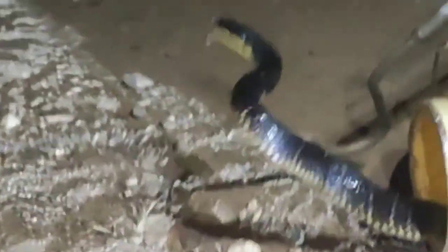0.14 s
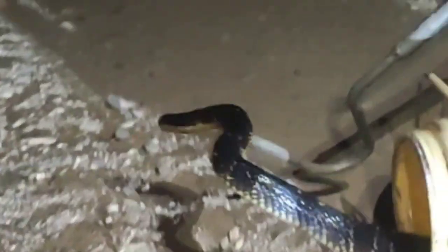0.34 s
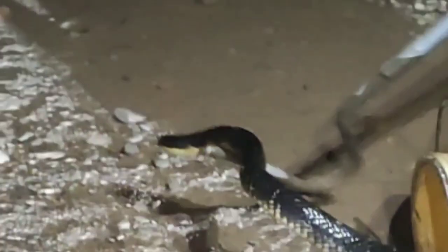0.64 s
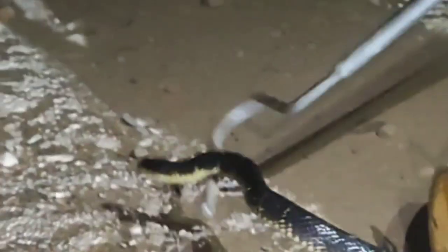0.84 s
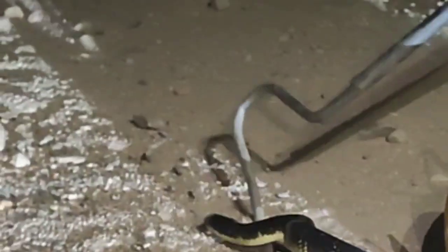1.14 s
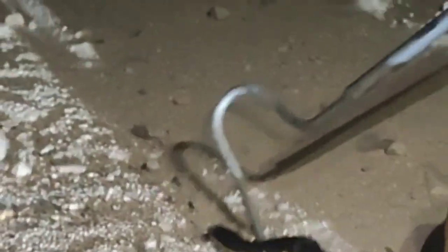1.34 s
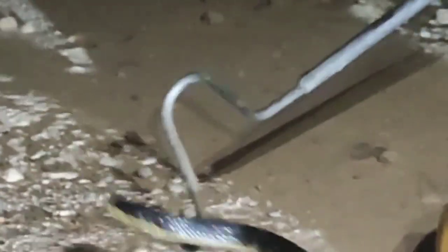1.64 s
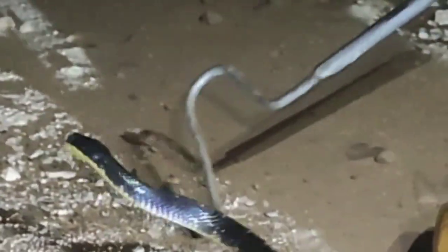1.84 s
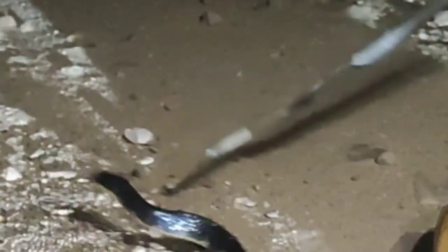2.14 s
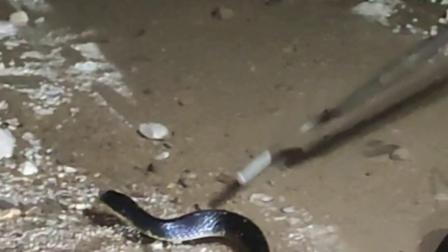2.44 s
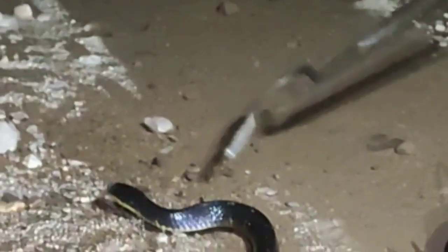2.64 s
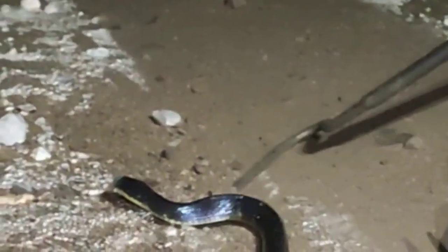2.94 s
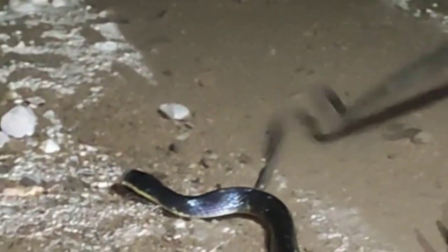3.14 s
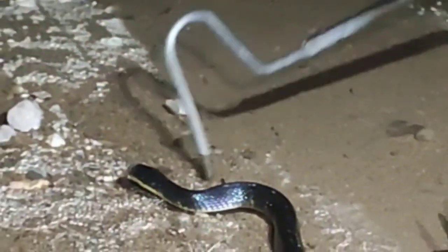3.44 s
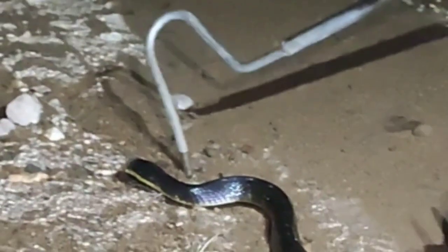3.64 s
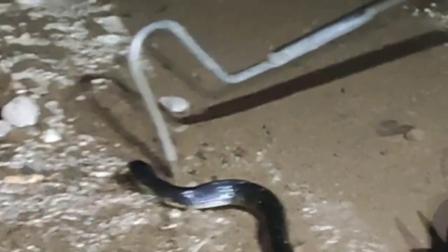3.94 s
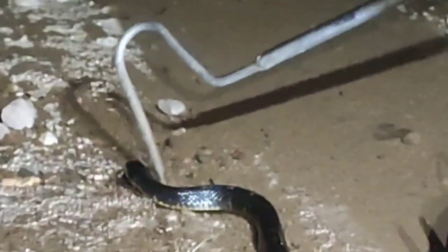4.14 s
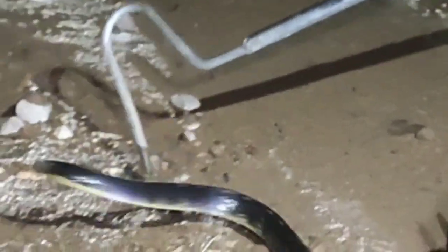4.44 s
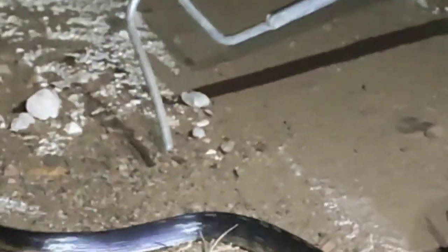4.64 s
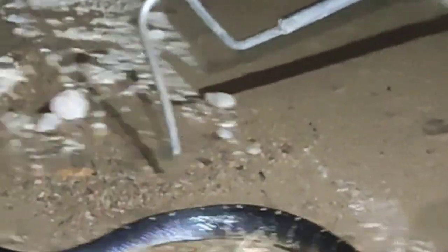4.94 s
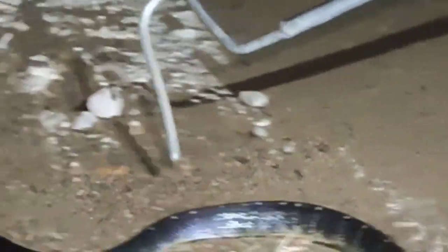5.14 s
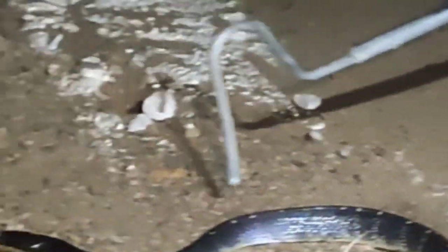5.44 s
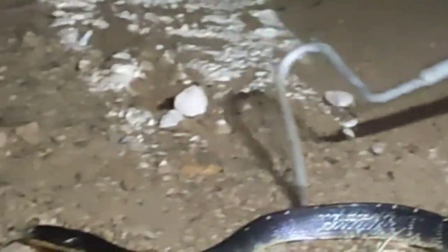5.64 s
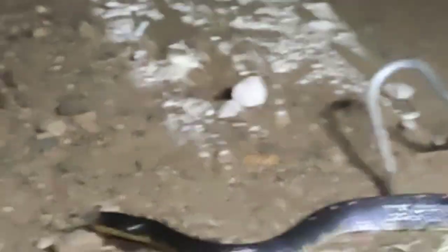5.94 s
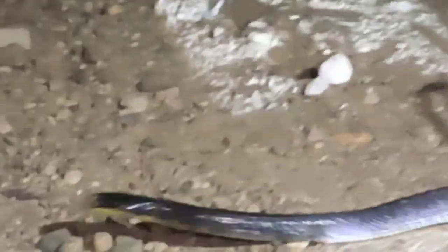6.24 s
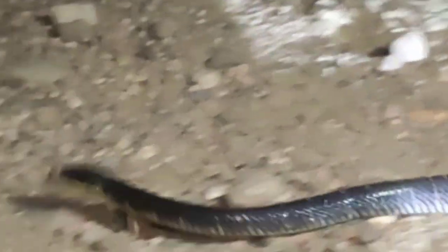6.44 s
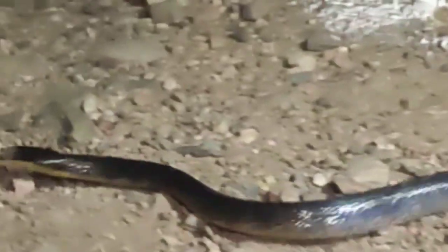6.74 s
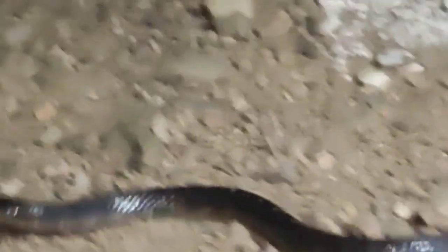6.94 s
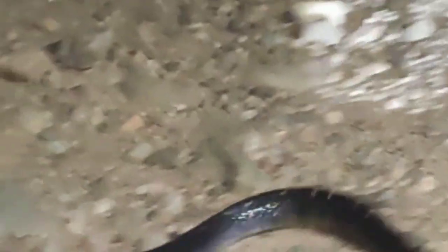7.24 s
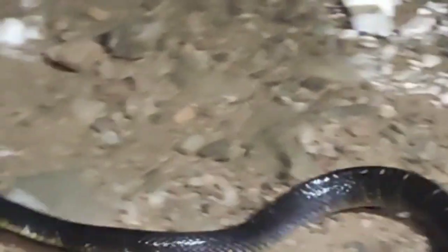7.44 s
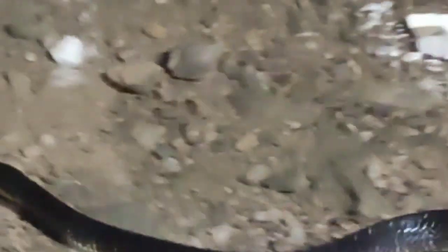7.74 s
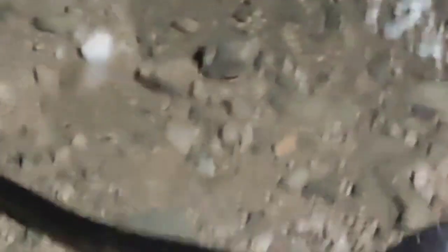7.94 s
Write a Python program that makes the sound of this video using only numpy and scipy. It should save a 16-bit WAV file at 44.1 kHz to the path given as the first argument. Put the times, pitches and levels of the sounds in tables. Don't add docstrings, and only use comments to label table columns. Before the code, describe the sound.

Night insects run throughout: wavering cricket trills around a low whistle pitch, a quick higher chirper, a thin airy rasp about three times a second, distant insect hiss and faint low rumble. Close by, from 0 to 0.3 s, gravel scuffs and a hollow pail knocks along in small jerks. Light metal touches and a pebble click come around 1.1 s. At 2.1-2.2 s a dull scuff and snap. At about 2.86 s the loudest event: a metal tube hits stone with a hard clack and bright inharmonic ring, rebounding and fading within about a third of a second. A pebble snaps at 3.3 s; faint stone groans follow to 4 s. Around 4.6-5 s stones shift, with grit and small metallic taps. At 6.2-6.4 s come gravel crunch and rapid clicks, a sharp snap at 6.7 s, a tiny metal tick at 7.3 s, then sliding and a final scuff near 8.1 s.

```python
import sys
import numpy as np
from scipy import signal
from scipy.fft import rfft, irfft
from scipy.io import wavfile
from scipy.ndimage import uniform_filter1d

SR = 44100
rng = np.random.default_rng(int(sys.argv[2]) if len(sys.argv) > 2 else 0)


def store_pcm(level_fs):
    pcm = np.round(np.clip(level_fs, -1, 1) * 32767).astype(np.int16)
    wavfile.write(sys.argv[1], SR, np.atleast_2d(pcm).T)


def natural_amplitude(level_db):
    exponent = np.asarray(level_db, float) / 20
    return 10 ** exponent


N = 357210
TIME_S = np.arange(N) / SR
BIN_HZ = np.maximum(np.fft.rfftfreq(N, 1 / SR), 1)

# [f/Hz, left-right likeness/1]
LIKENESS = [(60, 0.4), (150, 0.91), (370, -0.0064), (930, 0.65), (2320, 0.87), (5770, -1.1), (14400, -0.56)]
# [f/Hz, L-R/dB]
PORT_LEAN = [(500, 0), (2300, -5.5), (3500, -2.5), (6000, -2.5), (7300, -10.5), (8700, 9), (11000, 2.5),
             (14000, -0.5)]
LAG_S, STONE_LAG_S = 0.00043, .00024

# [f/Hz, density/dB per Hz]
NIGHT_SPECTRUM = [(12, 0.5), (20, 10), (38, -6.5), (85, -2.5), (109, -11.5), (333, -19.5), (481, -23),
                  (1120, -40), (1310, -35), (1850, -46), (2000, -38), (2600, -33), (4400, -120)]
# [f/Hz, density/dB per Hz]
FAR_SPECTRUM = [(1900, -15), (2040, -6.5), (2200, -1.5), (2650, -5.5), (2800, -12), (3000, -7.5), (3600, 0),
                (3870, -4.5), (4060, -15), (5000, -9.5), (6500, -4), (7300, -14), (8000, -14),
                (14500, -20.5)]
NIGHT_DB, FAR_DB = -58, -62.5

# [f/Hz, pulse rate/(1/s), level/dB, L-R/dB]
MORE_TRILLERS = [
    (2010, 26, -74, 0),
    (3580, 30, -72.5, -2),
]
# [f/Hz, pulse rate/(1/s), level/dB, L-R/dB]
TRILLERS = [(2273, 36, -71.5, -26), (2270, 19, -68.5, 12), (2362, 37.6, -67, 5.5), (2368, 33, -66, -20.5),
            (2353, 22, -62.5, 3.5), (2303, 13, -67.5, 12.5), (2462, 27, -75, -28.5), (2553, 29, -75, 23)]
# [t/s, level/dB]
CHIRPER = [(0, -53), (.3, -53), (.5, -59), (.85, -56), (1.4, -63.5), (2.3, -62), (3, -61), (4.5, -64),
           (5.8, -65.5), (6.1, -54.5), (6.45, -54.5), (6.8, -48.5), (7, -54), (7.4, -51), (7.85, -59),
           (8.1, -54)]
CHIRP_HZ, CHIRP_FIRST_S, CHIRP_PERIOD_S = 3228, .03, .07574

RASPS_S = [-.05, .277, .615, .942, 1.244, 1.564, 1.879, 2.213, 2.546, 2.87, 3.18, 3.483, 3.789, 4.124,
           4.491, 4.832, 5.191, 5.512, 5.855, 6.172, 6.496, 6.849, 7.17, 7.504, 7.846]
# [delay/s, level/dB, half length/s]
STROKES = [
    (0, 0, .031),
    (.1, 0, .035),
    (.19, -6, .055),
]
# [f/Hz, density/dB per Hz]
RASP_SPECTRUM = [(8000, -16), (9300, 1.5), (10400, 8.5), (11500, 9.5), (12400, 2.5), (13200, -22)]
RASP_DB = -67.5

# [f/Hz, density/dB per Hz]
STONES_SPECTRUM = [(53, -24), (90, 2.5), (128, -16), (179, -4), (252, -10.5), (307, -9.5), (667, -5),
                   (824, -5.5), (965, -6.5), (1410, -1.5), (2100, 1), (2730, -32), (4620, -120)]
# [f/Hz, density/dB per Hz]
GRIT_SPECTRUM = [(1900, -3), (2200, -7), (2800, -7.5), (3500, -0.5), (4150, -6), (5000, -8), (6500, 1.5),
                 (7300, -3.5), (8000, -12.5), (9500, -11), (13100, -10), (14600, -33)]
# [t/s, level/dB]
SLIDE = [(0, -64.5), (.24, -81), (.3, -74.5), (1.1, -77.5), (1.6, -81.5), (1.92, -63.5), (2.1, -67.5),
         (2.46, -67), (2.8, -73), (3.3, -66.5), (3.55, -80), (4.4, -87), (4.63, -66.5), (5.2, -68.5),
         (5.35, -79.5), (5.8, -78), (6.5, -67), (7.2, -67), (8.1, -72)]
SLIDE_GRIT_DB = -12.5
# [peak t/s, stones level/dB, grit level/dB, time to fade 20 dB/s]
SCUFFS = [(0, -60, -64, 0.17), (.115, -59.5, -68, 0.24), (0.331, -63.5, -66, -0.08), (.6, -73, -79, 0.2),
          (1.15, -68.5, -73.5, 1), (1.65, -72.5, -72, 0.2), (2.141, -53, -60.5, -0.1),
          (2.215, -60, -66.5, 0.2), (2.47, -68.5, -74, 0.6), (2.844, -67, -58, 0.2),
          (2.869, -51, -49, 0.19), (3.04, -70, -58, 0.24), (3.6, -66, -67, 0), (3.91, -77, -87.5, 3.5),
          (4.401, -66, -75.5, 0.21), (4.7, -67.5, -74.5, 0.06), (4.82, -65, -67.5, 0.55),
          (4.95, -62, -76, -0.04), (4.866, -67, -55, -0.03), (5.44, -69.5, -67, 0.15),
          (5.815, -62, -70, -0.68), (5.95, -71.5, -72.5, 1), (6.17, -61.5, -68, 0.27),
          (6.195, -58, -63.5, 0.3), (6.235, -64, -64.5, 0.22), (6.262, -66, -70, 0.33), (6.5, -76, -71, 1),
          (6.774, -64, -79.5, -0.5), (7.29, -79, -68.5, 1), (8.095, -58, -58, -0.14)]
SCUFF_RISE = 0.38
GRAIN_CYCLES = 6.5

# [t/s, level/dB]
PAIL_JERKS = [(.035, -47), (.06, -53), (.106, -53), (.131, -53), (.164, -54), (.195, -52), (.215, -52.5),
              (.6, -66), (.745, -61.5)]
# [f/Hz, level/dB, swell/s, L-R/dB]
PAIL_TONES = [
    (810, -1, 0.0024, 1),
    (1410, -7.5, 0.0016, 11.7),
]

# [t/s, peak level/dB, f/Hz, L-R/dB]
SNAPS = [(.034, -46.5, 427, 1.5), (.328, -52, 334, 1), (1.137, -47.5, 1440, 7.5), (2.213, -38, 1380, -3.5),
         (3.308, -52, 334, -1), (2.474, -48, 725, -4), (3.3072, -36, 1110, -4), (5.978, -43, 1240, 3),
         (6.225, -34, 1800, -6), (6.257, -38, 4200, -13), (6.2575, -40, 2400, -14), (6.268, -40, 3660, -12),
         (6.272, -39, 3000, -8), (6.188, -44, 3000, -5), (6.205, -45, 2600, -5), (3.418, -50, 2300, -3),
         (4.19, -50, 2300, -3), (6.3672, -41, 4300, -16), (.036, -40, 3500, -2), (.0595, -52, 2600, -3),
         (.107, -52, 3300, 0), (.152, -57, 2500, 0), (6.32, -42, 1600, -3.5), (6.7312, -32.5, 1340, 1.5),
         (7.76, -47.5, 950, -5)]
# [t/s, peak level/dB, f/Hz, L-R/dB]
TICKS = [(1.18, -52, 1300, 0), (2.109, -54, 470, -1), (2.553, -47.5, 810, -8), (2.864, -32, 592, -1.5),
         (3.248, -44, 1650, -8), (3.3085, -46, 770, -14), (5.815, -57, 1360, -15), (6.075, -53, 1140, -13),
         (6.368, -48, 2940, 4), (6.654, -56, 1220, -32), (7.398, -47, 1530, -3)]
# [t/s, peak level/dB, f/Hz, L-R/dB]
CLACKS = [(2.8478, -32, 7100, -8), (2.849, -40, 10200, -3), (2.85, -39, 12800, -3), (2.8505, -41, 9000, 0),
          (1.1378, -46, 6640, -5), (4.8625, -41, 7500, -5), (4.887, -44, 12800, -3), (4.9, -42, 6800, -6),
          (6.18, -47, 1500, -4), (6.2, -44, 1900, -11), (6.208, -53, 706, -8), (6.218, -59, 620, -8),
          (6.24, -45, 1890, -7), (6.378, -51, 1500, -8), (.153, -58, 1300, 0), (.0595, -48, 8100, 7),
          (.105, -54, 8200, 8), (2.864, -17.5, 1770, -1.5), (2.866, -40, 1205, -23),
          (2.875, -46.5, 459, 1.5), (4.89, -52, 369, -2), (5.003, -56.5, 329, 0), (5.06, -60, 320, -3),
          (6.19, -54, 646, -15)]
SNAP_CYCLES, TICK_CYCLES, CLACK_CYCLES = 0.57, 1.04, 3.24

# [t/s, peak level/dB, f/Hz, swell/s]
GROANS = [(3.641, -64, 1304, 0.011), (3.66, -66, 1460, .01), (3.7, -63.5, 1353, 0.04),
          (3.74, -70, 1480, .02), (3.79, -69, 1297, 0.02), (3.9, -63.5, 1330, 0.019),
          (4.0, -76, 1310, 0.026), (4.61, -57.5, 301, 0.018), (4.77, -57, 1370, 0.029),
          (4.86, -55, 445, 0.02), (4.76, -65, 540, 0.021), (4.885, -54, 1730, .004),
          (4.96, -64, 846, 0.012), (4.8, -67, 630, .01), (4.92, -60, 1490, .008), (4.96, -59, 400, 0.0068),
          (4.84, -60, 1500, .008), (5.19, -62, 1190, .006), (6.17, -52, 1230, 0.015),
          (6.22, -47, 1510, 0.0045)]
# [t/s, peak level/dB, f/Hz, swell/s]
MORE_GROANS = [
    (6.466, -57, 500, .006),
    (4.64, -63, 845, .012),
    (4.68, -60, 840, .012),
    (4.73, -63, 850, .01),
    (4.765, -62, 845, .014),
]
GROAN_PAN_DB, GROAN_WOBBLE_RAD, GROAN_FLUTTER_DB = -3.5, 1.5, 3.0
ECHO_DB, ECHO_T60_S = -13.0, .05

TUBE_HZ = [2169, 2432, 2686, 2916, 3064, 3510, 4039, 4488, 4848, 5308, 5834, 6407, 6452, 6904, 6971, 7341,
           7934, 8666, 9347, 9869, 10072, 10413, 11050, 11798, 12507, 12970, 13190, 13639, 14178]
# [full blow level/dB, t60/s, L-R/dB, glancing touch level/dB]
TUBE = [(0.5, 0.16, 3, -37), (-18.5, 0.27, 9.5, -34), (-9, 0.11, 4, -35), (-8.5, 0.46, -7, -18),
        (6.5, 0.14, -12, -20), (-25, 0.083, 19.5, -24), (-2, 0.23, 1, -25), (-24, 0.1, -14, -9),
        (-11.5, 0.29, -10, -14), (-1.5, 0.25, -18, -14.5), (-6, 0.25, -8, -1.5), (-4, 0.26, -36, -18),
        (9, 0.25, -25, -26), (-20, 0.4, -30, -10.5), (-2, 0.26, -8, -14), (-16, 0.35, -11, -5.5),
        (-15, 0.29, -16, -20.5), (-23.5, 0.22, 8.5, -34), (-32.5, 0.32, 9.5, -37), (-20, 0.31, -10, -36),
        (-14, 0.15, -8, -31), (-18, 0.18, -13, -34), (-30, 0.37, -15, -29), (-31, 0.34, 5.5, -37.5),
        (-28, 0.31, -14, -33), (-27, 0.4, 3, -28), (-47, .3, -4, -30), (-27, 0.51, -17, -49),
        (-25.5, 0.32, -8, -47)]
# [t/s, peak level/dB, mode index from 0, swell/s, L-R/dB]
SINGS = [(2.875, -33, 10, 0.016, -9), (2.96, -48, 10, 0.017, -5), (3.075, -49.5, 10, .025, -9),
         (2.83, -50, 14, .008, -8), (2.835, -48, 4, .008, -8), (1.195, -60, 14, 0.0067, -9),
         (4.845, -52, 13, .01, -8), (1.178, -61.5, 8, .015, -5), (1.137, -58, 18, .005, 0),
         (2.862, -42, 6, 0.014, -4), (3.03, -55, 8, 0.04, -5), (3.03, -57, 9, .025, -12),
         (3.045, -48, 10, 0.029, -9), (3.11, -48, 10, 0.015, -10), (3.05, -49, 14, 0.032, -11),
         (4.79, -60, 26, .03, 0), (4.84, -60, 27, .015, 0), (4.862, -49, 13, 0.0094, -9.5),
         (4.885, -55, 4, 0.023, 0), (4.845, -52, 5, 0.01, -7)]
# [t/s, level/dB, brightness/dB per octave, crack level/dB, damped after/s]
SQUARE = [
    (2.863, -21, 2, -38, 0.15),
    (2.968, -40, 4.5, -16, 0.087),
]
# [t/s, level/dB, brightness/dB per octave, crack level/dB, damped after/s]
ANGLED = [(1.194, -54, 8, -1, 0.093), (2.8468, -25.5, 8.5, 2, 0.018), (3.018, -41, 1, -5, 0.14),
          (3.1847, -50, -3, 12, 0.034), (4.778, -51, 3, 4, 0.009), (4.885, -37, 19.5, 11.5, 0.026),
          (8.086, -57.5, -14.5, -3, .02)]
# [t/s, level/dB, brightness/dB per octave, crack level/dB, damped after/s]
GLANCING = [(1.137, -44.5, -0.5, 10.5, 0.0043), (1.155, -53.5, 9, -11, 0.012),
            (1.181, -57, -2.5, -10, 0.036), (2.474, -55, -14.5, 0, 0.003), (2.805, -61, 0, 9, 0.026),
            (3.035, -48, 14, 5, 0.11), (3.602, -64.5, 15, 14, 0.037), (4.8604, -42.5, 3, 11, 0.01),
            (4.872, -45, 7, 16, 0.012), (5.432, -65, 8, 17, 0.13), (6.2565, -55, -7, 3, 0.0035),
            (6.268, -58, -11, 6, 0.0031), (7.2867, -37, 15, 4, 0.0048), (7.2913, -42.5, 15, -12, 0.0098)]
# [t/s, level/dB, brightness/dB per octave, crack level/dB, damped after/s]
LIFTING = [
    (3.056, -49, 0, -20, 0.1),
]
# [slant/0-1, share of free decay when damped after 0.1 s/1]
KINDS = [
    (0.148, 0.82),
    (0.54, 0.63),
    (0.902, 0.84),
    (.95, 1.8),
]
RING_LAW = 0.45
BLOW_RISE_S, BLOW_RISE_LAW = 0.0075, 1.15
MORE_MODES_HZ = [1450, 1948, 2337, 2686, 3506, 3555, 3902, 3975, 4510, 4580, 5262, 5460, 6901, 5874, 6655, 7369,
                 3700, 9980]
# [level/dB, t60/s, L-R/dB]
MORE_MODES = [(-30, 0.097, -10), (-37, 0.18, 1), (-38, 0.21, 5.5), (-41, 0.17, 9), (-32.5, 0.34, -10),
              (-37, 0.27, -8), (-35.5, 0.28, -13), (-32, 0.21, -10), (-41, .25, -2), (-32, 0.11, 2),
              (-29, 0.26, -1), (-41, 0.24, -5), (-40, 0.22, -10), (-32, .25, -8), (-44, .2, -8),
              (-33, 0.22, -10), (-49, .2, -8), (-48, .2, -5)]
MORE_MODES_S, MORE_MODES_RISE_S = 2.862, 0.0044
RATTLE_HZ = [4700, 7500]
RATTLE_DB, RATTLE_T60_S = -39, 0.3

# [f/Hz, level/dB]
MUTE = [(1000, -107), (1900, -97.5), (2800, -94), (3500, -98), (4150, -97), (6000, -96), (8000, -96.5),
        (11000, -97.5), (14000, -104)]
DIP_HZ, DIP_WIDTH_HZ, DIP_DB = 4310, 78, -7


def in_time(rows):
    s, *columns = np.transpose(rows)
    return [np.interp(TIME_S, s, c) for c in columns]


def at_hz(points, hz):
    table_hz, value = np.array(points).T
    return np.interp(np.log(hz), np.log(table_hz), value)


def rms_one(x):
    return x / np.sqrt(np.mean(x ** 2) + 1e-20)


def colour(x, spectrum):
    inside = (BIN_HZ > spectrum[0][0]) & (BIN_HZ < spectrum[-1][0])
    lean_db = at_hz(PORT_LEAN, BIN_HZ) * [[.5], [-.5]]
    gain = inside * natural_amplitude(at_hz(spectrum, BIN_HZ) + lean_db)
    return rms_one(irfft(rfft(x) * gain, N))


def drift(rate_hz):
    knots = rng.standard_normal(int(N / SR * 60) + 2)
    return np.interp(TIME_S * np.clip(rate_hz, .1, 59), np.arange(len(knots)), knots)


def diffuse():
    alike = np.clip(at_hz(LIKENESS, BIN_HZ), 0, 1)
    mid, side = rfft(rng.standard_normal((2, N)))
    return irfft(np.sqrt(1 + alike) * mid + np.sqrt(1 - alike) * side * [[1], [-1]], N)


def add(out, at_s, sound, pan_db, lag_s=LAG_S):
    for channel, start_s, pan_share in ((0, at_s + lag_s, 1), (1, at_s, -0.21)):
        i = int(start_s * SR)
        heard = np.atleast_2d(natural_amplitude(pan_share * pan_db) * sound).sum(axis=0)
        place = out[channel, i:i + len(heard)]
        place += heard[:len(place)]


def night_air():
    return natural_amplitude(NIGHT_DB + drift(3.67)) * colour(diffuse(), NIGHT_SPECTRUM)


def far_insects():
    return natural_amplitude(FAR_DB + 0.22 * drift(35)) * colour(diffuse(), FAR_SPECTRUM)


def trillers(crickets):
    out = np.zeros((2, N))
    for hz, per_s, level_db, pan_db in crickets:
        wing = np.cumsum(per_s * (1 + 0.04 * drift(3))) / SR + rng.random()
        pulses = np.maximum(np.sin(2 * np.pi * wing) + 0.48, 0)
        tone = 2 * np.pi * np.cumsum(hz * (1 + .006 * drift(30))) / SR
        for channel, sign in enumerate((.5, -.5)):
            level = natural_amplitude(level_db + sign * pan_db + 2.2 * drift(20))
            out[channel] += level * pulses * np.sin(tone + 2.03 * drift(9))
    return out


def chirper():
    cycle = np.cos(2 * np.pi * (TIME_S - CHIRP_FIRST_S) / CHIRP_PERIOD_S)
    pulses = np.clip(1.3 * cycle + .3, 0, 1)
    tone = 2 * np.pi * CHIRP_HZ * TIME_S + .8 * drift(8)
    wave = np.array([np.sin(tone), np.sin(tone + 1.2 + .3 * drift(3))])
    return natural_amplitude(in_time(CHIRPER)[0] - 7) * pulses * wave


def bush_cricket():
    strokes = np.zeros(N)
    for s in RASPS_S:
        near = slice(max(int((s - .1) * SR), 0), int((s + .4) * SR))
        for delay_s, stroke_db, half_s in STROKES:
            bell = np.exp(-((TIME_S[near] - s - delay_s) / half_s) ** 2)
            strokes[near] += natural_amplitude(RASP_DB + stroke_db) * bell
    tooth_hz = 270 * (1 + 0.19 * drift(36))
    teeth = 1 + 0.13 * np.cos(2 * np.pi * np.cumsum(tooth_hz) / SR)
    return strokes * teeth * colour(diffuse(), RASP_SPECTRUM)


def grains(clicks, low_hz, high_hz, count):
    dealt = np.cumsum(clicks != 0) * 7 % count
    out = 0
    for k, hz in enumerate(np.geomspace(low_hz, high_hz, count)):
        r, w = natural_amplitude(-60 * hz / (GRAIN_CYCLES * SR)), 2 * np.pi * hz / SR
        b = [np.sin(w), 0, -np.sin(w)]
        a = [w, -2 * w * r * np.cos(w), w * r * r]
        out = out + np.sqrt(hz) * signal.lfilter(b, a, clicks * (dealt == k) + 1e-18)
    return out


def crunch(spectrum, per_s, ring_hz):
    sizes = natural_amplitude(3.5 * np.minimum(rng.exponential(1, N), 4)) * rng.choice([-1, 1], N)
    struck = rng.random(N) < per_s * natural_amplitude(4 * drift(25)) / SR
    clicks = rms_one(grains(sizes * struck, *ring_hz, count=24))
    pair = np.array([np.roll(clicks, int(STONE_LAG_S * SR)), clicks])
    return colour(pair + .6 * diffuse(), spectrum)


def gravel():
    slide_db = in_time(SLIDE)[0]
    power = natural_amplitude(2 * (slide_db + np.array([[0], [SLIDE_GRIT_DB]])))
    for s, stones_db, grit_db, fade_s in SCUFFS:
        fade_s = max(fade_s, .02)
        near = slice(max(int((s - 2 * fade_s) * SR), 0), int((s + 2 * fade_s) * SR))
        since_s = TIME_S[near] - s
        fade_db = -20 * np.maximum(since_s / fade_s, -since_s / (fade_s * SCUFF_RISE))
        power[:, near] += natural_amplitude(2 * (fade_db + np.array([[stones_db], [grit_db]])))
    stones = crunch(STONES_SPECTRUM, per_s=1100, ring_hz=(150, 2400))
    grit = crunch(GRIT_SPECTRUM, per_s=2500, ring_hz=(2200, 13000))
    return natural_amplitude(4.0) * np.sqrt(power[0]) * stones + natural_amplitude(8.0) * np.sqrt(power[1]) * grit


def contacts(rows):
    out = np.zeros((2, N))
    wobble, flutter = GROAN_WOBBLE_RAD * drift(59), GROAN_FLUTTER_DB * drift(45)
    for s, level_db, hz, pan_db, swell_s in rows:
        t = np.arange(int(8 * max(swell_s, .0002) * SR)) / SR
        i = int(s * SR)
        turn = wobble[i:i + len(t)] - wobble[i]
        flutter_db = flutter[i:i + len(t)] - flutter[i]
        shape = t / swell_s * np.exp(1 - t / swell_s)
        tone = np.sin(2 * np.pi * hz * t + turn)
        lag_s = STONE_LAG_S if hz < 2000 else LAG_S
        add(out, s, natural_amplitude(level_db + flutter_db) * shape * tone, pan_db, lag_s)
    return out


def pail():
    return contacts([(s, db + tone_db, hz, pan_db, swell_s)
                     for s, db in PAIL_JERKS for hz, tone_db, swell_s, pan_db in PAIL_TONES])


def pebbles():
    rows = []
    for kind, cycles in ((SNAPS, SNAP_CYCLES), (TICKS, TICK_CYCLES), (CLACKS, CLACK_CYCLES)):
        rows += [(s, db, hz, pan_db, cycles / hz) for s, db, hz, pan_db in kind]
    return contacts(rows)


def groans():
    return contacts([(s, db, hz, GROAN_PAN_DB, swell_s)
                     for rows in (GROANS, MORE_GROANS) for s, db, hz, swell_s in rows])


def singing_tube():
    return contacts([(s, db, TUBE_HZ[round(mode)], pan_db, swell_s)
                     for s, db, mode, swell_s, pan_db in SINGS])


def scatter(near):
    t = np.arange(SR // 10) / SR
    echo = rng.standard_normal((2, len(t))) * natural_amplitude(-60 * t / ECHO_T60_S) * (t > .0005)
    echo *= natural_amplitude(ECHO_DB) / np.sqrt(np.sum(echo ** 2, axis=1, keepdims=True))
    return near + signal.fftconvolve(near.mean(axis=0, keepdims=True), echo, axes=1)[:, :N]


def more_modes():
    out, t = np.zeros((2, N)), np.arange(SR // 3) / SR
    rise = 1 - np.exp(-t / MORE_MODES_RISE_S)
    late_rise = 1 - np.exp(-t / (3.0 * MORE_MODES_RISE_S))
    for hz, (level_db, t60_s, pan_db) in zip(MORE_MODES_HZ, MORE_MODES):
        envelope = (late_rise if hz > 5000 else rise) * natural_amplitude(level_db - 60 * t / t60_s)
        add(out, MORE_MODES_S, envelope * np.sin(2 * np.pi * hz * t), pan_db)
    band = signal.butter(4, RATTLE_HZ, "band", fs=SR, output="sos")
    grit = rms_one(signal.sosfilt(band, rng.standard_normal(len(t))))
    add(out, MORE_MODES_S, rise * natural_amplitude(RATTLE_DB - 60 * t / RATTLE_T60_S) * grit, -10.0)
    return out


def hook():
    out = np.zeros((2, N))
    hz = np.array(TUBE_HZ)[:, None]
    blow_db, t60_s, pan_db, touch_db = np.array(TUBE).T[:, :, None]
    kinds = zip((SQUARE, ANGLED, GLANCING, LIFTING), KINDS)
    knocks = sorted((*row, *kind) for rows, kind in kinds for row in rows)
    luck = rng.standard_normal((len(knocks), len(TUBE), 2))
    band = signal.butter(2, [1200, 13500], "band", fs=SR, output="sos")
    cracks = signal.sosfilt(band, rng.standard_normal((len(knocks), 15000)))

    knots = rng.standard_normal((2, len(TUBE), 72))
    at_knot = np.arange(35000) / 500
    chatter = np.array([[np.interp(at_knot, np.arange(72), mode) for mode in part] for part in knots])

    for knock, chance, crack in zip(knocks, luck, cracks):
        s, level_db, tilt_db, crack_db, held_s, slant, ring = knock
        t = np.arange(min(int((held_s + .04) * SR), 15000)) / SR
        slant = np.clip(slant, 0, 1)
        mode_db = (1 - slant) * blow_db + slant * (touch_db + 6 + 3.0 * chance[:, :1])
        strike_db = level_db + mode_db + tilt_db * np.log2(hz / 6400)

        free_share = np.clip(ring * (10 * held_s) ** RING_LAW, .03, 4)
        decay_db = -60 * t / (t60_s * free_share) - 1500 * np.maximum(t - held_s, 0)
        slow_s = BLOW_RISE_S * (hz / 4000) ** BLOW_RISE_LAW * max(1 - 3 * slant, 0)
        rise = 1 - np.exp(-t / (.0015 + slow_s))

        start = int(s * SR / 4) % 20000
        jolt = chatter[:, :, start:start + len(t)] * (.55 + .8 * slant)
        jolt_db, jolt_rad = 4.0 * jolt[0], .75 * jolt[1]
        phase = 2 * np.pi * hz * t + slant * chance[:, 1:] + jolt_rad
        add(out, s, rise * natural_amplitude(strike_db + decay_db + jolt_db) * np.sin(phase), pan_db)

        crack_level = natural_amplitude(level_db + crack_db - 6 - 60 * t / .055) * (1 - np.exp(-t / .003))
        add(out, s, crack_level * crack[:len(t)], -6)
    return out


def scene():
    night = night_air() + far_insects()
    insects = trillers(MORE_TRILLERS) + trillers(TRILLERS) + chirper() + bush_cricket()
    near = scatter(gravel() + pail() + pebbles() + groans() + singing_tube())
    return night + insects + near + more_modes() + hook()


def roll_off(x):
    return signal.sosfilt(signal.butter(12, 14500, fs=SR, output="sos"), x)


def record(dry):
    hz, _, cells = signal.stft(dry, SR, nperseg=2048)
    cells = cells * natural_amplitude(DIP_DB * np.exp(-((hz - DIP_HZ) / DIP_WIDTH_HZ) ** 2))[:, None]
    power = np.mean(abs(cells) ** 2, axis=0)
    nearby = uniform_filter1d(uniform_filter1d(power, size=6, axis=0), size=2, axis=1)
    masked = natural_amplitude(2 * -18.5) * uniform_filter1d(power, size=480, axis=0)
    masked += natural_amplitude(2 * -18.0) * uniform_filter1d(power, size=40, axis=0)
    masked *= (hz > 2700)[:, None]
    heard = nearby > natural_amplitude(2 * at_hz(MUTE, np.maximum(hz, 1)))[:, None] + masked
    kept = signal.istft(cells * heard, SR, nperseg=2048)[1][:, :N]
    return roll_off(kept)


dry = scene()
out = record(dry)
store_pcm(out)
```